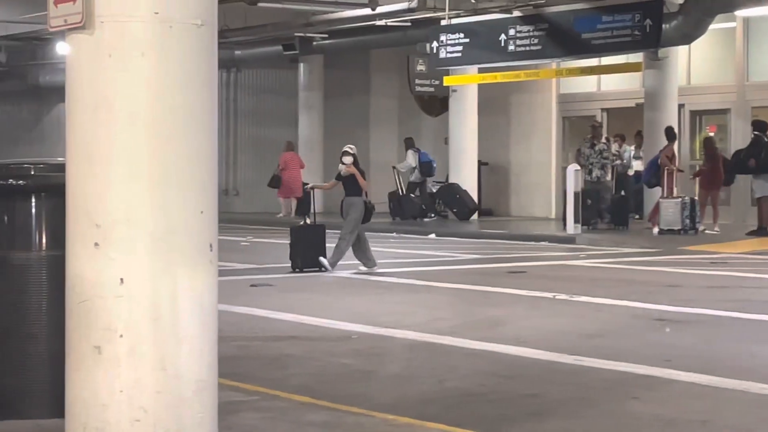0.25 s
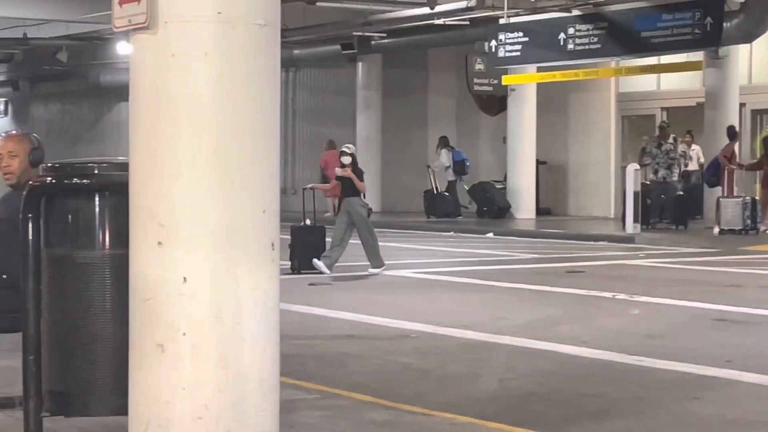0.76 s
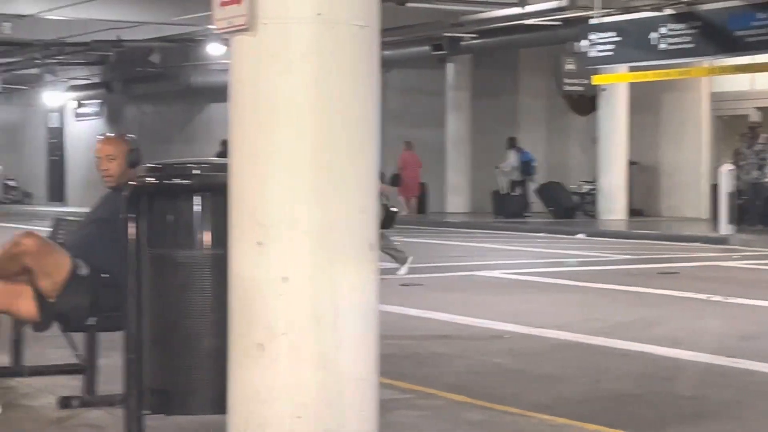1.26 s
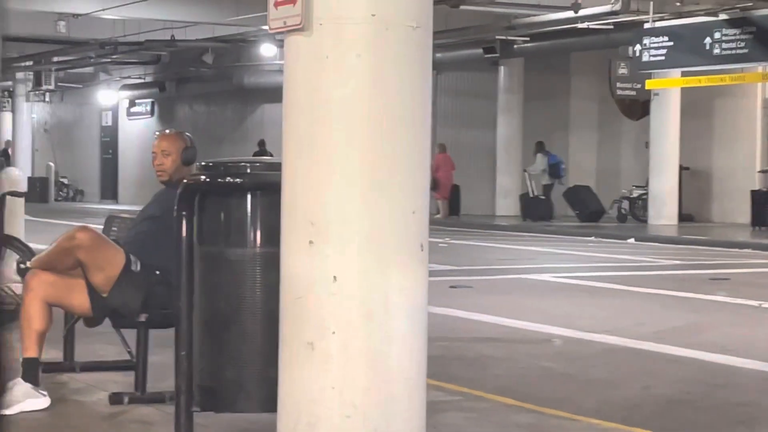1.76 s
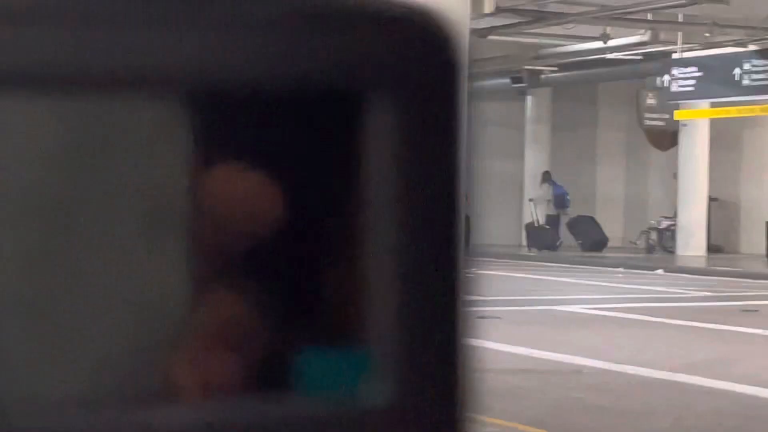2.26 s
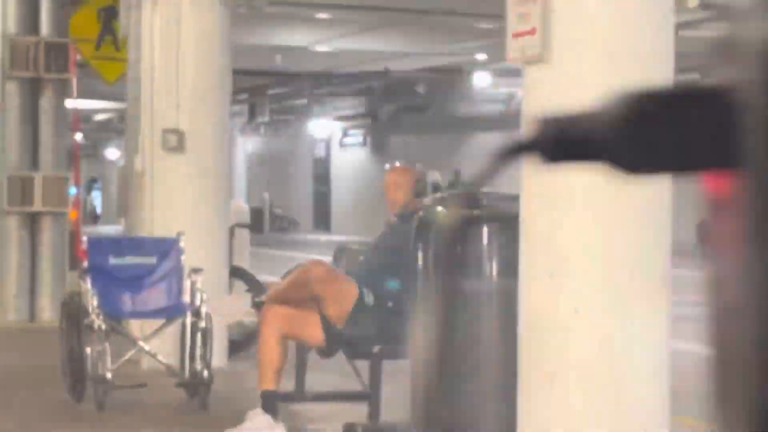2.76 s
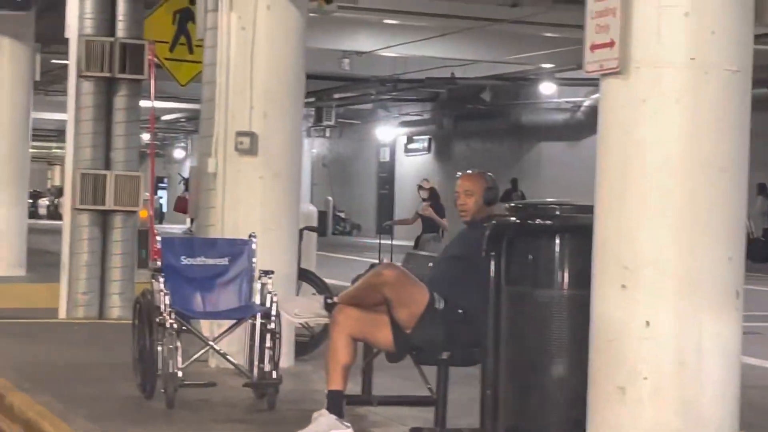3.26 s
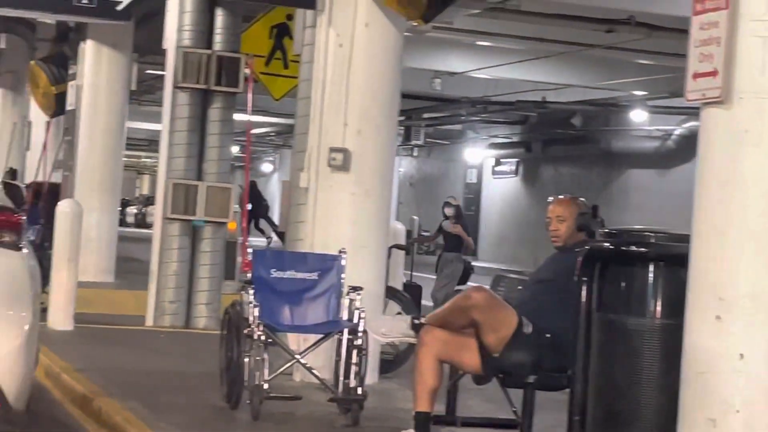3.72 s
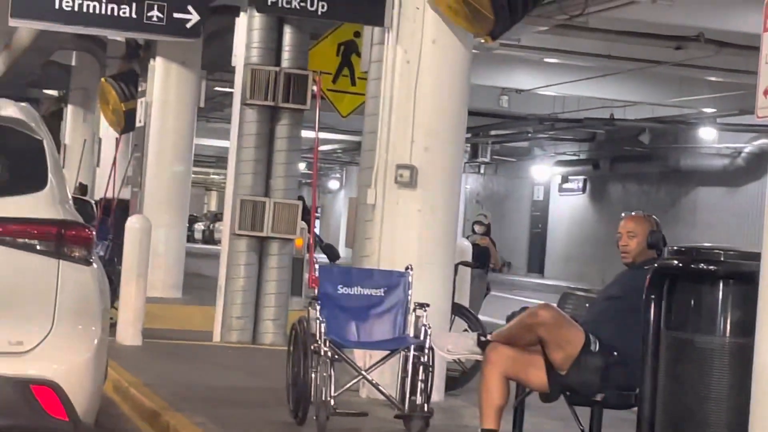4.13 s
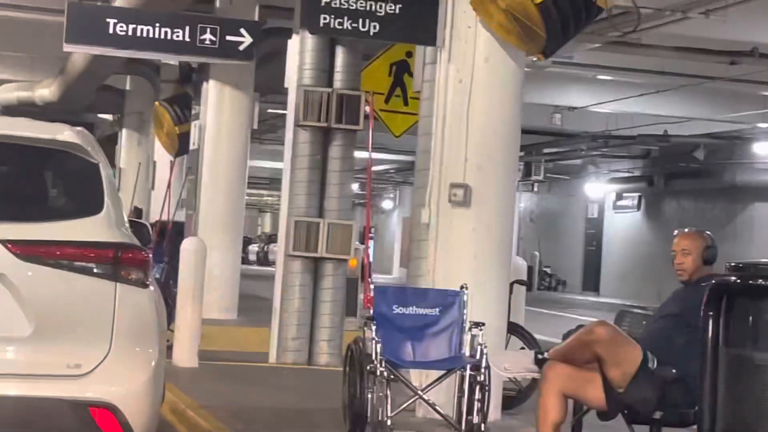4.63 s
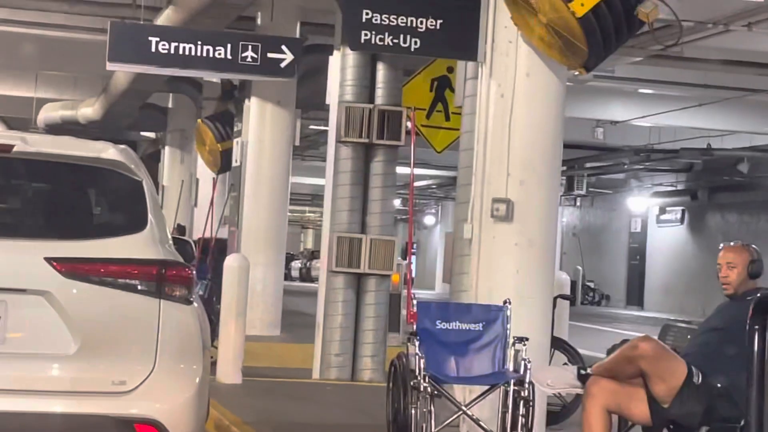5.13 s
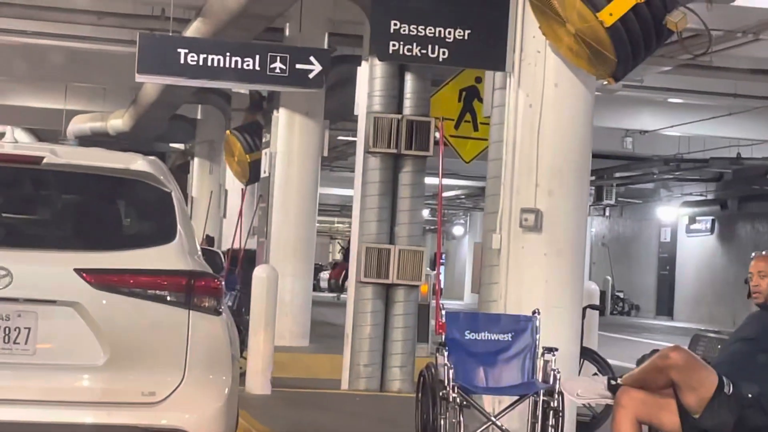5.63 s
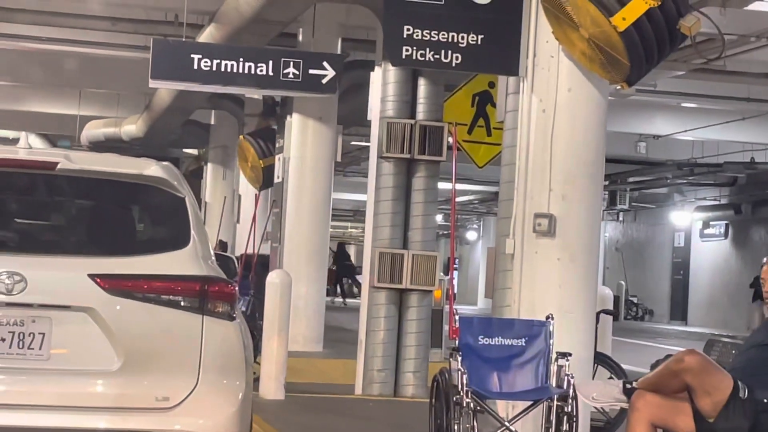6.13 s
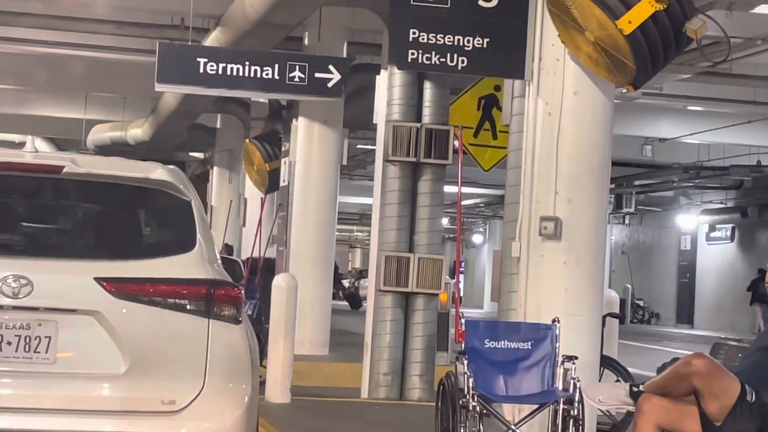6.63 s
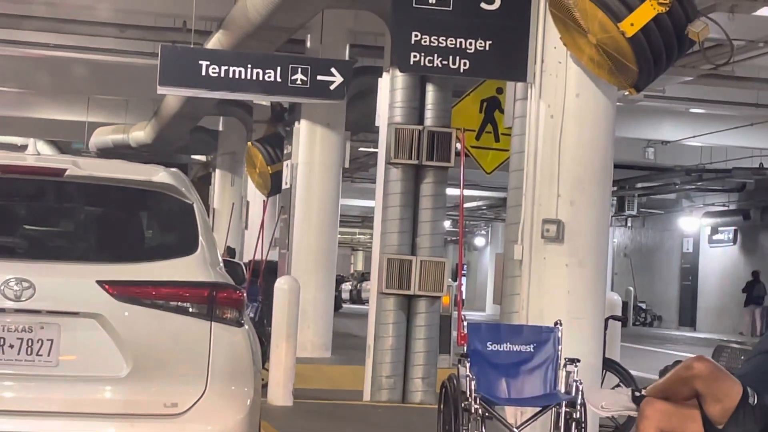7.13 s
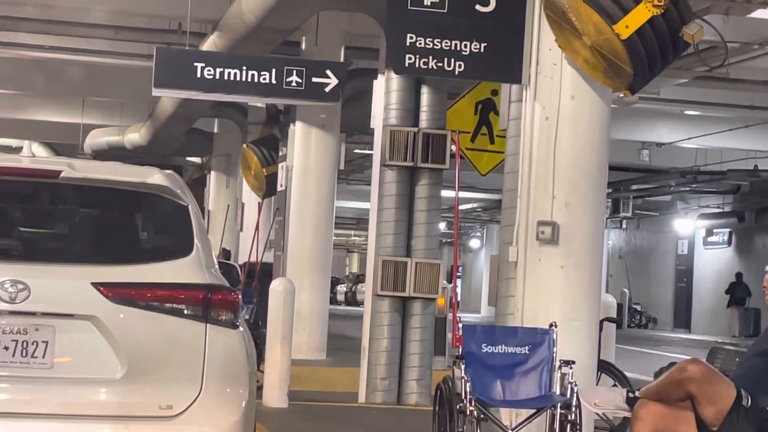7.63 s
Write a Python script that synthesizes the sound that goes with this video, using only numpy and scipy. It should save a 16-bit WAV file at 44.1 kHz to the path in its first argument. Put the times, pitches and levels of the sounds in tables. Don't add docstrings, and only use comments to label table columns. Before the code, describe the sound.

Low engine idle drone and dull garage rumble inside a car, with soft plastic knocks, cloth rubbing and one sharp catch snap near six seconds.

```python
import sys
import numpy as np
from scipy import signal
from scipy.fft import rfft, irfft, next_fast_len
from scipy.io import wavfile
from scipy.ndimage import uniform_filter1d, map_coordinates

SR = 44100
rng = np.random.default_rng(int(sys.argv[2]) if len(sys.argv) > 2 else 0)


def wrap_up_sound(samples):
    columns = np.atleast_2d(samples).T
    tamed = np.clip(columns, -1, 1)
    steps = np.round(tamed * 32767).astype(np.int16)
    wavfile.write(sys.argv[1], SR, steps)


def makeup_ratio(level_db):
    decades = np.asarray(level_db, float) / 20
    return 10 ** decades


N = 347508


def unit(x):
    return x / np.sqrt(np.mean(x ** 2) + 1e-20)


def along(points, hz):
    f, value = np.transpose(points)
    return np.interp(np.log(hz + 1), np.log(f + 1), value)


def curves(rows):
    s, *columns = np.transpose(rows)
    return [np.interp(np.arange(N) / SR, s, column) for column in columns]


def wobble(rate):
    points = rng.standard_normal(int(N * rate / SR) + 4)
    return map_coordinates(points, [np.arange(N) * rate / SR])


def filtered(x, response):
    size = next_fast_len(x.shape[-1] + 8192)
    spectrum = rfft(x, size) * response(np.fft.rfftfreq(size, 1 / SR))
    return irfft(spectrum, size)[..., :x.shape[-1]]


def spread(pair, gain):
    # frequency in Hz, left-right likeness (1 = the same).
    alike = [(60, .97), (130, .95), (300, .93), (700, .78), (1100, .52), (1700, .4), (2200, .6), (2700, 1),
             (6100, 1), (6600, .93), (7800, .98), (8900, .98), (10000, .93), (10500, 1), (12300, 1),
             (13000, .93)]

    def shares(hz):
        turn = np.arccos(np.clip(along(alike, hz), -1, 1)) / 2
        return gain(hz) * [np.cos(turn), np.sin(turn)]

    mid, side = filtered(pair, shares)
    return np.array([mid + side, mid - side])


def rush(spectrum, patchy_db, streaky_db=0):
    z = signal.stft(rng.standard_normal((2, N)), nperseg=512)[2]

    def blotches(high, long):
        grain = uniform_filter1d(rng.standard_normal(z.shape[1:]), size=high, axis=0)
        return unit(uniform_filter1d(grain, size=long, axis=1))

    gain_db = patchy_db * blotches(6, 10)
    if streaky_db:
        gain_db = gain_db + streaky_db * blotches(2, 24)
    pair = signal.istft(z * makeup_ratio(gain_db), nperseg=512)[1][:, :N]
    return unit(spread(pair, lambda hz: makeup_ratio(along(spectrum, hz))))


def tone(hz, db, drift, rate=6):
    phase = 2 * np.pi * np.cumsum(hz + np.zeros(N)) / SR
    phase = phase + drift * wobble(rate) + rng.uniform(0, 2 * np.pi)
    apart = 0.09 * np.array([[1], [-1]]) * wobble(5.3)
    return np.sqrt(2) * makeup_ratio(db) * np.sin(phase + apart)


def add_at(out, start_s, sound):
    start = round(start_s * SR)
    out[:, start:start + sound.shape[-1]] += sound


def microphone_hiss():
    # frequency in Hz, level in dB per Hz.
    hiss_color = [(2500, -25), (5000, 1.5), (8000, -1.5), (11000, 3), (11800, 0.5), (12030, 17), (12250, 1),
                  (15700, -2.5)]
    return makeup_ratio(-95.5) * rush(hiss_color, patchy_db=0.0)


def traffic():
    # time in seconds, roar level in dB.
    roar_levels = [(0, -39.5), (2.6, -37.5), (4.8, -37.5), (6, -37), (7.88, -37)]
    # frequency in Hz, level in dB per Hz.
    rumble_color = [(15, -26.5), (25, -12.5), (38, -13), (46, -4), (58, -8.5), (70, -7.5), (90, -15),
                    (115, -10.5), (150, -16.5), (240, -16.5), (340, -21.5), (450, -21.5), (700, -50.5),
                    (1200, -100)]
    buzz_color = [(280, -38.5), (480, -0.5), (606, -9), (717, -10), (780, -10.5), (858, -16.5), (1350, -24),
                  (1500, -29), (2270, -34.5), (3120, -41), (3770, -42.5), (6000, -63.5), (7800, -103.5),
                  (13200, -120)]
    roar_db, = curves(roar_levels)
    rumble = makeup_ratio(roar_db + 6.0 + 1.3 * wobble(7.8)) * rush(rumble_color, patchy_db=1.1)
    buzz_db = -46.5 + 0.1 * (roar_db - roar_db.mean()) + 0.41 * wobble(1.5)
    buzz = makeup_ratio(buzz_db + 1.2 * wobble(25)) * rush(buzz_color, patchy_db=1.0)
    return rumble + buzz


def ventilation():
    # time in seconds, peak level in dB, half length in seconds.
    swells = [(.12, -43.5, 0.17), (0.566, -32, .09), (1.108, -35.5, 0.17), (1.896, -34.5, 0.11),
              (2.406, -40.5, 0.37), (2.935, -36, 0.14), (3.607, -36, 0.24), (4.278, -41, 0.13),
              (4.707, -33.5, 0.19), (5.22, -37.5, 0.3), (6.04, -36.5, 0.26), (6.76, -31, 0.14),
              (7.257, -35, 0.089), (7.6, -51, 0.22)]
    # multiple of the blade tone, level in dB.
    overtones = [(.5, -1), (.88, -5), (1.49, -7), (2, -13), (2.5, -14)]
    blade_hz, swell_fall_db = 128.3, 9.5
    t = np.arange(N) / SR
    slow = t[::64]
    humps = [db - swell_fall_db * ((slow - s) / half) ** 2 for s, db, half in swells]
    blade = tone(blade_hz, np.interp(t, slow, np.max(humps, axis=0)), drift=0.83)
    family = sum(tone(k * blade_hz, -42 + db + 5 * wobble(8), drift=1.42, rate=14)
                 for k, db in overtones)

    fade_db = -9 * np.maximum(t - 4.9, 0)
    whine_hz = 3650 + 12 * wobble(1.5)
    whine = tone(whine_hz, -84.5 + fade_db + 3.5 * wobble(4.6), drift=0.33)
    partner = tone(whine_hz + 33, -89.5 + fade_db + 1.9 * wobble(27), drift=.3)
    return blade + family + (whine + partner).mean(axis=0)


def engine():
    # time in seconds, level of the firing tone in dB.
    firing_levels = [(0.0, -28), (0.06, -28), (1.01, -29.5), (1.56, -27.5), (2.54, -31.5), (4.08, -25.5),
                     (4.17, -30), (5.68, -29), (5.77, -23.5), (5.84, -37), (5.93, -21.5), (6.14, -34.5),
                     (6.43, -27.5), (6.5, -38), (6.67, -22), (6.74, -34.5), (6.98, -26.5), (7.88, -31)]
    firing_hz = 50.45
    firing_db = curves(firing_levels)[0] + 0.42 + 0.93 * wobble(9)
    firing = tone(firing_hz, firing_db, drift=0.19)
    third = tone(firing_hz * 3 / 2, -35 + 2 * wobble(9.7), drift=1.1, rate=13)
    return firing + third


def cloth():
    # start in seconds, hold in seconds, level in dB, dullness (extra low part) in dB.
    strokes = [(.97, 0.12, -69.5, -1), (1.252, 0.037, -76.5, 4.5), (2.9, 0.65, -87.5, 9.5),
               (4.035, 0.13, -70, -3), (4.272, 0.32, -70, 0.5), (4.6, 0.4, -74.5, 1.5),
               (5.03, .14, -81.5, 5.5), (5.3, .2, -78, 0), (5.525, 0.056, -67.5, -1),
               (5.656, 0.024, -65, -9), (5.797, .38, -72, 2.5), (6.31, 0.13, -67, -2),
               (6.431, 0.04, -66.5, -1), (6.515, .38, -68, 4), (6.975, .13, -67.5, -2),
               (7.157, 0.18, -68, 0.5), (7.423, .2, -75.5, 1.5), (7.654, 0.01, -64.5, -13),
               (7.724, .04, -71, 5), (7.85, 0.056, -66.5, 5.5)]
    # frequency in Hz, level in dB per Hz.
    cloth_color = [(900, -28), (1500, -8), (2100, 2.5), (2900, -3.5), (3300, -2), (3550, -3.5), (3900, -4),
                   (4900, -5), (5300, -5), (5700, -6.5), (6500, -6.5), (8500, -6.5), (13000, -18),
                   (15700, -18.5)]
    rise_db_per_s, fall_db_per_s = 97.5, 83
    rest_db, rest_dull_db = -89, -1.5
    t = np.arange(0, N, 64) / SR
    s, hold, db, dull_db = np.transpose(strokes)[:, :, None]
    before, after = np.maximum(s - t, 0), np.maximum(t - s - hold, 0)
    power = makeup_ratio(2 * (db - rise_db_per_s * before - fall_db_per_s * after))
    bright = np.sqrt(power.sum(axis=0) + makeup_ratio(2 * rest_db))
    dull_power = (power * makeup_ratio(2 * dull_db)).sum(axis=0)
    dull = np.sqrt(dull_power + makeup_ratio(2 * (rest_db + rest_dull_db)))
    bright, dull = curves(np.transpose([t, bright, dull]))

    catching = makeup_ratio(0.48 * wobble(17) + 1.3 * wobble(30) + 1.1 * wobble(250))
    rub = rush(cloth_color, patchy_db=1.25, streaky_db=2.0) * catching
    low = filtered(rub, lambda hz: 1 / (1 + (hz / 4200) ** 6))
    return makeup_ratio(6.0) * (dull * low + bright * (rub - low))


def knocks():
    # time in seconds, peak level in dB, pitch in Hz, thump level in dB.
    hard_knocks = [(1.496, -31, 533, -12), (1.53, -24, 550, -3), (1.581, -29.5, 490, -5.5),
                   (1.615, -29, 687, -16), (1.711, -36.5, 676, -4), (1.749, -39.5, 450, 3.5),
                   (1.953, -42.5, 590, 8), (2.062, -40, 473, 5.5), (2.278, -25, 729, 3.5),
                   (2.748, -27.5, 557, -0.5), (2.86, -32.5, 760, -6), (2.948, -22, 475, -8),
                   (3.015, -21, 563, -2), (3.094, -24, 554, -2), (3.232, -20.5, 524, -1.5),
                   (3.333, -25, 530, 1), (3.338, -26, 525, 0.5), (3.385, -33, 592, -8),
                   (3.411, -19, 566, -12), (3.411, -13.5, 726, -5.5), (5.006, -17, 548, -4),
                   (7.276, -28, 577, 0.5), (7.314, -29, 536, -1.5)]
    # time in seconds, peak level in dB.
    taps = [
        (1.777, -47),
        (1.828, -46),
        (1.88, -40.5),
        (2.358, -47),
        (2.455, -50),
        (3.029, -44),
        (3.112, -44),
        (3.276, -46),
        (5.189, -42),
        (5.232, -44.5),
    ]
    out, t = np.zeros((2, N + SR)), np.arange(SR // 8) / SR
    lag = -.3 * np.array([[1], [-1]])
    hits = [(s, db, hz, 28.5, thump_db) for s, db, hz, thump_db in hard_knocks]
    for s, db in taps:
        hits.append((s, db, 1014 * (1 + 0.054 * rng.standard_normal()), 60, -12))
    for s, db, hz, ring_ms, thump_db in hits:
        ring = makeup_ratio(-60e3 * t / max(ring_ms, 10)) * np.sin(2 * np.pi * hz * t + lag)
        thump = makeup_ratio(thump_db - 60 * t / .014) * np.sin(2 * np.pi * 890 * t + lag)
        rattle = filtered(rng.standard_normal((2, len(t))),
                          lambda f: np.exp(-(np.log(f / 1000 + 1e-3) / .3) ** 2))
        knock = makeup_ratio(0.5) * (ring - thump) + makeup_ratio(-27.5 - 60 * t / .1) * unit(rattle)
        onset = (1 - np.exp(-t / 0.00077)) ** 2
        add_at(out, s - .0004, makeup_ratio(db + 4.5) * knock * onset)
    trim = signal.butter(5, 1300, fs=SR, output="sos")
    return signal.sosfilt(trim, out[:, :N])


def spring_pings():
    # time in seconds, pitch in Hz, level in dB, seconds to die by 60 dB.
    pings = [(5.957, 1985, -52, .25), (5.93, 13900, -56, .1), (5.955, 6750, -62, .12),
             (5.953, 3400, -50, .05), (6.013, 2580, -34, .04), (6.080, 1400, -32, .05),
             (6.083, 1190, -34, .05), (6.081, 2550, -43, .04), (5.916, 1300, -36, .04),
             (5.921, 1180, -36, .07), (5.958, 1180, -42, .06), (5.942, 2550, -48, .04),
             (5.882, 3500, -42, .03), (5.553, 2500, -48, .04), (4.306, 2170, -55, .06),
             (7.0, 1980, -58, .1), (4.467, 2300, -50, .02), (4.467, 3300, -52, .015),
             (7.318, 2400, -52, .06), (1.062, 2500, -62, .06), (2.413, 1800, -54, .03)]
    out, t = np.zeros((2, N + SR)), np.arange(SR // 6) / SR
    onset = 1 - np.exp(-t / 0.00023)
    for s, hz, db, t60 in pings:
        add_at(out, s, makeup_ratio(db - 60 * t / t60) * np.sin(2 * np.pi * hz * t) * onset)
    return out[:, :N]


def scuffs_and_snaps():
    # time in seconds, peak level in dB, low part in dB.
    scuffs = [(1.2528, -50, -6.5), (4.311, -46.5, -7.5), (5.5221, -41.5, -3), (5.5531, -36, 0),
              (5.587, -49.5, -13), (6.137, -56, 0), (6.985, -44.5, -10), (7.049, -46, -10),
              (7.2812, -42, -5.5), (7.3182, -42.5, 4.5), (7.3454, -43.5, -7.5), (7.667, -44, -16),
              (7.7235, -43, -1), (7.8228, -48.5, -11.5), (7.8596, -38, -8.5)]
    # time in seconds, peak level in dB, decay in ms, high part in dB.
    snaps = [
        (5.875, -46.5, 70, -15.5),
        (5.8826, -33, 59, -23),
        (5.8943, -21.5, 96, -17.5),
        (5.907, -12, 30, -18),
        (5.9209, -34, 38, -20.5),
        (5.9427, -38, 55, -17.5),
        (5.9544, -41.5, 110, -22.5),
        (6.0125, -33, 44, -20.5),
        (6.0673, -35, 77, -12),
        (6.0777, -31, 75, -13),
    ]
    # time in seconds, peak level in dB, high part in dB.
    ticks = [
        (1.856, -61, -28),
        (2.4119, -39.5, -29.5),
        (2.5525, -46.5, -41.5),
        (4.3046, -42.5, -23.5),
        (4.4334, -41.5, -25),
        (4.4673, -46, -26),
        (4.6826, -46.5, -24),
    ]
    # center in Hz, width in Hz, level in dB.
    modes = [(1060, 360, 8.5), (2520, 260, -3), (3564, 240, 3.5), (4520, 110, -5.5), (5400, 170, -11),
             (5820, 580, -8), (7100, 210, -13.5), (8950, 3400, -14.5), (14100, 1300, -4.5)]
    out, t = np.zeros((2, N + SR)), np.arange(SR // 6) / SR

    def shell(f):
        return .5 + sum(makeup_ratio(db) * 1j * f * w / (c * c - f * f + 1j * f * w) for c, w, db in modes)

    bursts = [(s, db, 78, low_db, -21.5) for s, db, low_db in scuffs]
    bursts += [(s, db, decay_ms, -11.5, high_db) for s, db, decay_ms, high_db in snaps]
    bursts += [(s, db, 26, -7, high_db) for s, db, high_db in ticks]
    for s, db, decay_ms, low_db, high_db in bursts:
        grain_db = 1.2 * rng.standard_normal(len(t) // 32 + 1).repeat(32)[:len(t)]
        grit = rng.standard_normal((2, len(t))) * makeup_ratio(grain_db)
        fade = makeup_ratio(-60e3 * t / max(decay_ms, 8)) + makeup_ratio(-16.5 - 60 * t / 0.14)
        onset = 1 - np.exp(-t * 40 / decay_ms * 1000)
        tilt = [(700, -41.5), (1200, low_db + 4.0), (2000, low_db + 12.0), (2700, low_db + 9.5),
                (3300, -4), (7500, .45 * high_db + 7.5), (9000, high_db + 15.0),
                (15700, high_db + 2.0)]
        burst = spread(grit * fade * onset, lambda f: shell(f) * makeup_ratio(along(tilt, f)))
        add_at(out, s - .0005, makeup_ratio(db - 1.0) * burst / np.abs(burst).max())
    return out[:, :N]


def scene():
    background = traffic() + ventilation() + engine()
    return background + cloth() + knocks() + spring_pings() + scuffs_and_snaps()


def low_pass(x):
    return signal.sosfilt(signal.butter(12, 15730, fs=SR, output="sos"), x)


def record(dry):
    # frequency in Hz, half turns by which the right channel leads.
    lead = [(6150, 0), (6400, .2), (7250, .5), (8000, .96), (8650, 1.04), (9300, 1.35), (10200, 1.65),
            (10500, 2), (12400, 2), (13300, 2.6), (14000, 3)]
    noisy = np.pad(dry + microphone_hiss(), [(0, 0), (2048, 0)], "reflect", reflect_type="odd")
    sides = np.array([[-1], [1]])
    ports = filtered(noisy, lambda hz: np.exp(.5j * np.pi * sides * along(lead, hz)))
    settle = np.sin(np.pi / 2 * np.minimum(np.arange(N) / (.006 * SR), 1)) ** 2
    return low_pass(settle * ports[:, -N:])


dry = scene()
out = record(dry)
wrap_up_sound(out)
```